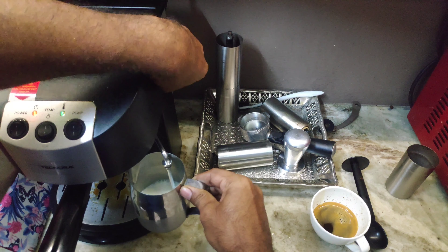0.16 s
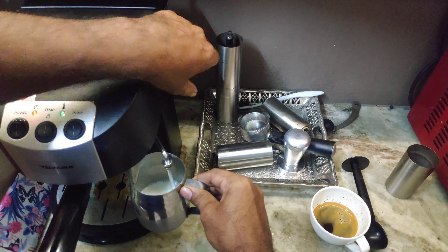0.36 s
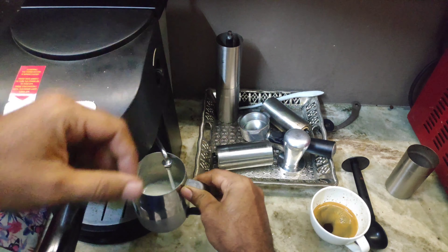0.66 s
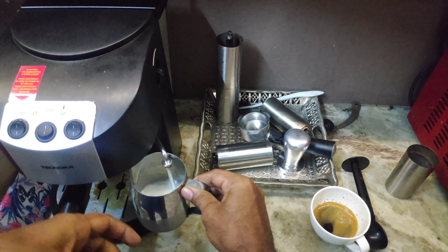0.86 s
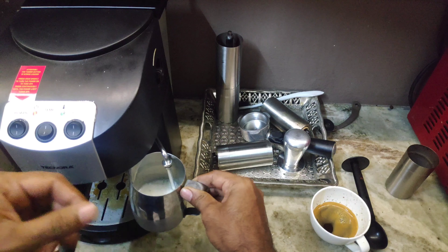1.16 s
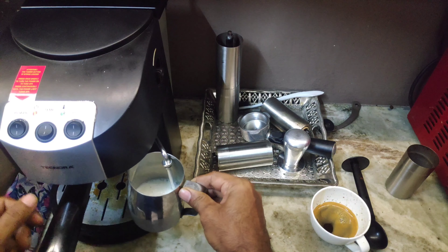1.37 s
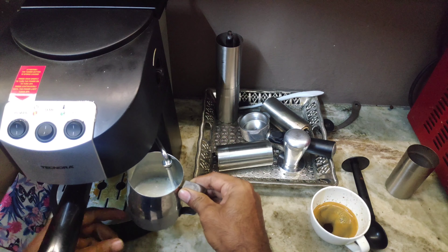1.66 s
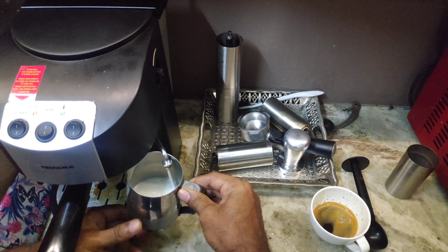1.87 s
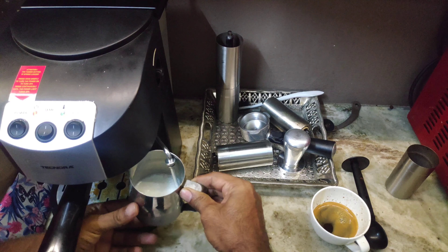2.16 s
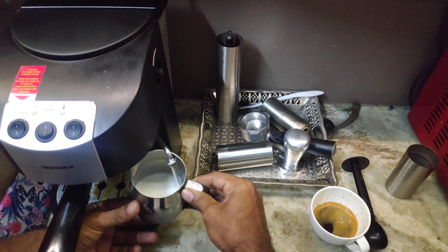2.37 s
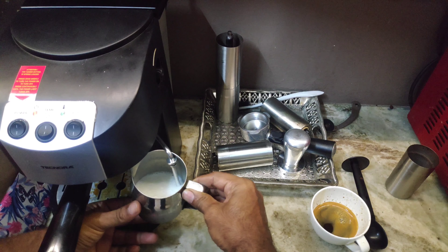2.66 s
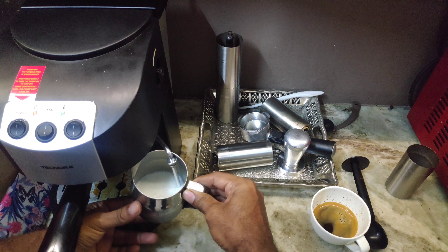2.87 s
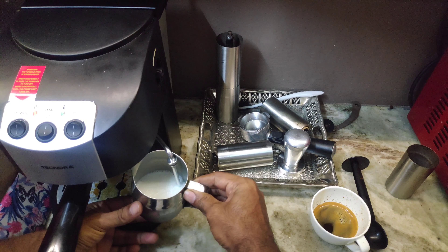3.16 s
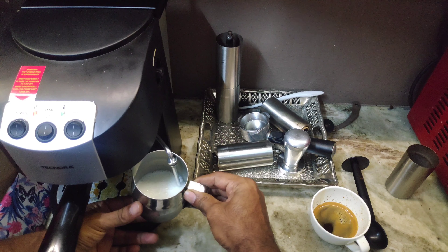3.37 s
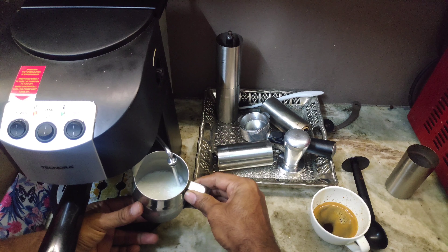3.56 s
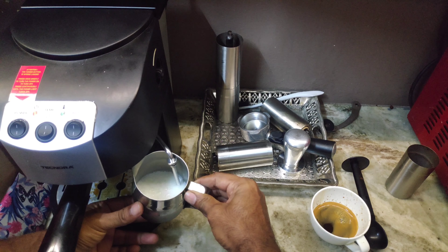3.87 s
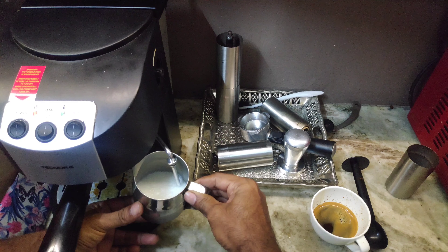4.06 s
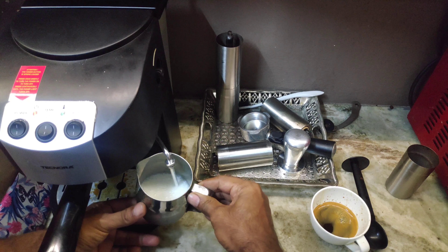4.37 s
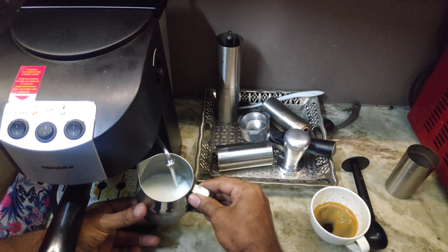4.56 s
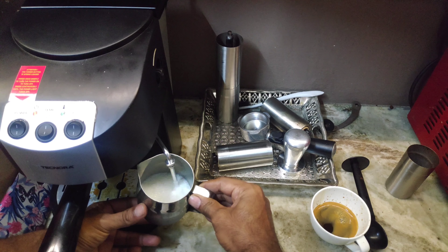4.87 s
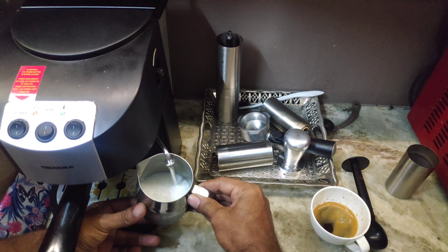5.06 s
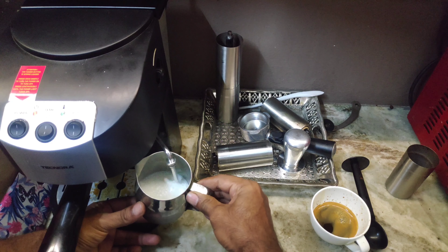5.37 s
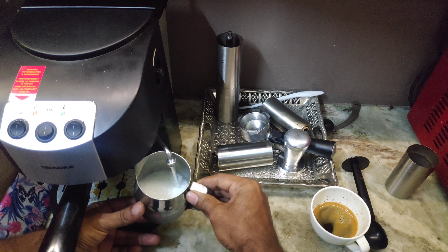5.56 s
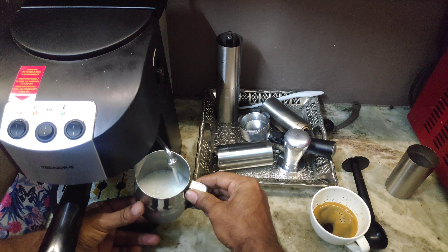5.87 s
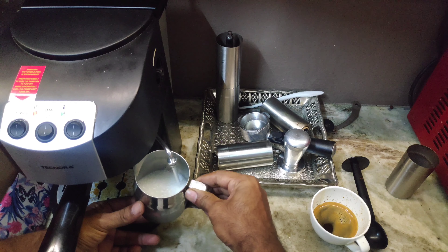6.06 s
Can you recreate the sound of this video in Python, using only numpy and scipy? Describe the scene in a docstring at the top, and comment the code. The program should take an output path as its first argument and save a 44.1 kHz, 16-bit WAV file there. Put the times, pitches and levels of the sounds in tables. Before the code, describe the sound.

A steam wand froths milk in a small steel pitcher in a kitchen, heard close in stereo. Sharp, bright hisses spit in quick irregular bursts over a low gurgling churn and hollow bubble blips. Spurts come fast at first, soften and space out in the middle, then grow dense and forceful again near five seconds. Fine foam fizzes; a faint low hum lies underneath.

```python
"""A steam jet hisses in uneven spurts as its tip breaks the surface of milk in a steel pitcher, heard close in stereo.
Hiss is noise and spatter rung by the steel wall; churn is clumped clicks and noise rung by the air column.
Bursting bubbles are pairs of rising notes, spat drops are noise snaps, the hollow whistle is a narrow noise band.
Fine foam fizzes and a low room hum lies below. Streaks, notches and differences between sides shape the mix."""
import sys
import numpy as np
from scipy import signal
from scipy.fft import rfft, irfft, next_fast_len
from scipy.io import wavfile
from scipy.ndimage import uniform_filter1d, map_coordinates

SR = 44100
rng = np.random.default_rng(int(sys.argv[2]) if len(sys.argv) > 2 else 0)


def pcm_store(signal):
    """Save signal as 16-bit PCM."""
    levels = np.round(np.clip(np.atleast_2d(signal), -1, 1) * 32767)
    wavfile.write(sys.argv[1], SR, levels.astype(np.int16).T)


N = 273861

# Spurts as the tip breaks the surface. Each row: full at in seconds, rise in ms (20 dB), hold in ms,
# hiss level in dB, hiss brightness in dB per octave, churn level in dB, churn depth in dB per octave, body in dB.
SPURTS = [(0.003, 14, 83, -19, 2, -40.5, 7, -3.5), (0.15, 26, 2, -27.5, 11, -35, 1, 2),
          (0.204, 30, 21, -30, 3, -52, 0, 3.5), (0.284, 22, 31, -18, 8.5, -33.5, -2, 5.5),
          (0.451, 32, 14, -23, 10, -34, 0, 9.5), (0.622, 22, 18, -14.5, 0.5, -37.5, 0, -13.5),
          (0.685, 9, 3, -22, 16, -42, -10, 2), (0.72, 4.9, 33, -23, 4.5, -36.5, -3.5, 2),
          (0.778, 4.7, 28, -21, 2.5, -31.5, 0.5, 0), (0.901, 44, 38, -23, 4.5, -35.5, -3, -0.5),
          (1.099, 15, 47, -25, 6, -32.5, -3.5, 8.5), (1.229, 130, 26, -21.5, 2, -35, -2, -0.5),
          (1.517, 156, 46, -23.5, -1, -33, -3.5, -4.5), (1.776, 110, 86, -37.5, 4.5, -35.5, -2, 7),
          (2.064, 110, 52, -30.5, 1, -42, 10, -5), (2.268, 17, 50, -26, 3.5, -35.5, 0.5, 2),
          (2.405, 220, 2, -30, 1.5, -35.5, -4.5, 5), (2.539, 36, 130, -25.5, 4, -33, -1.5, 2),
          (2.705, 6, 18, -32, 2, -38, -1.5, 8), (2.934, 37, 7.8, -20.5, 0, -29, -2, -2.5),
          (2.991, 14, 44, -25, 1.5, -32, -3, -6.5), (3.146, 67, 2, -31, 5, -31.5, -2.5, 2),
          (3.203, 11, 10, -23, 1.5, -37, -2, -6), (3.28, 81, 134, -31.5, 2, -33.5, -6.5, 3),
          (3.469, 280, 80, -28, 1, -35.5, -2, 3.5), (3.648, 66, 36, -32, 0, -39, -1, 5.5),
          (3.792, 67, 16, -27, -0.5, -32.5, -1.5, 7), (4.062, 100, 79, -31, 1.5, -34, -7, 2),
          (4.288, 28, 88, -32, 3, -42, 5, 7), (4.646, 290, 97, -24.5, -3, -32, -1.5, -1),
          (4.78, 12, 41, -22.5, 2.5, -28, -2.5, 4), (4.883, 38, 26, -17, 1.5, -27, -1, -4.5),
          (5.008, 33, 24, -21, -2, -24.5, -5, -5), (5.088, 18, 13, -30, 5, -27, -1, 6.5),
          (5.265, 38, 53, -18.5, 2.5, -36.5, 1.5, -2), (5.427, 10, 2, -31.5, 2, -52, -1, -6),
          (5.587, 26, 3, -29.5, 9, -31, -8.5, 3), (5.621, 18, 3.3, -22, 1, -32.5, 1, 0),
          (5.704, 20, 23, -27, 4.5, -49, -11, 2), (5.762, 12, 110, -29, 2.5, -41.5, 12, 0.5),
          (5.871, 47, 15, -25, 1.5, -34.5, -6.5, -2.5), (5.926, 26, 34, -23.5, 0.5, -37.5, 8, -7.5),
          (6.05, 240, 5, -28, -0.5, -34, 0, -4.5), (6.147, 110, 44, -27, 3.5, -31.5, -3.5, 1)]
# Ringing of the steel wall. Each row: centre in Hz, least width in Hz, level in dB.
WALL_MODES = [(4450, 170, -1), (5300, 150, -2), (7350, 90, -1), (7660, 100, 0), (8570, 120, -3),
              (10170, 110, -3), (10590, 110, -3), (11490, 120, -3), (12140, 130, -3), (13350, 200, -4),
              (14200, 130, 1)]


def amp(db):
    """Decibels to gain."""
    return 10 ** (np.asarray(db) / 20)


def rms_one(x):
    """Scaled to rms 1."""
    return x / np.sqrt(np.mean(x ** 2) + 1e-20)


def in_time(rows):
    """Columns after the time column, interpolated to one value a sample."""
    s, *columns = np.transpose(rows)
    return [np.interp(np.arange(N) / SR, s, c) for c in columns]


def at_hz(points, hz):
    """A table read on a log-frequency axis."""
    point_hz, values = np.array(points).T
    return np.interp(np.log(hz), np.log(point_hz), values)


def drift(rate_hz):
    """Slow random curve of rms 1: coarse noise through a double one-pole low-pass."""
    step = 20   # samples per coarse point
    settle = 2000   # coarse points dropped
    r = np.exp(-2 * np.pi * rate_hz * step / SR)
    coarse = rng.standard_normal(N // step + settle + 2)
    slow = signal.lfilter([1], [1, -2 * r, r * r], coarse)[settle:]
    return np.interp(np.arange(N) / step, np.arange(len(slow)), rms_one(slow - slow.mean()))


def white():
    """Plain noise."""
    return rng.standard_normal(N)


def grains(per_s, spread_db):
    """Random clicks of very uneven size and either sign; rms 1."""
    sizes = amp(spread_db * np.minimum(rng.exponential(1, N), 5)) * rng.choice([-1, 1], N)
    return rms_one(sizes * (rng.random(N) < per_s / SR))


def resonance(x, hz, width_hz):
    """Two-pole resonance of gain 1 on top."""
    r = np.exp(-np.pi * width_hz / SR)
    poles = [1, -2 * r * np.cos(2 * np.pi * hz / SR), r * r]
    return signal.lfilter([(1 - r * r) / 2, 0, (r * r - 1) / 2], poles, x)


def rung(x, modes):
    """The sound plus what it sets ringing; milk damps the wall, so no mode is very sharp."""
    return x + sum(amp(db) * resonance(x, hz, max(width_hz, hz / 110)) for hz, width_hz, db in modes)


def coloured(source, spectrum, span_hz, patchy_db, rate_hz, lean_db=0, pivot_hz=1000):
    """Shaped stereo sound whose third-octave bands flicker apart; lean_db per octave tilts it about the pivot."""
    # Each row: frequency in Hz, left minus right in dB.
    side_tilt = [(60, -0.5), (250, 1.5), (750, -4), (1200, 0.5), (1900, -5), (2900, -1.5), (4500, -5.5),
                 (5800, -5.5), (6800, -5.5), (7900, -3), (9500, -1.5), (11000, 5), (13000, 10), (14200, 9)]
    # Each row: frequency in Hz, correlation of the two sides (0-1).
    likeness = [(60, 1), (250, 1), (600, 0.73), (900, 0.67), (1250, 0.59), (1900, 0.6), (2250, 0.1),
                (2700, 0.16), (3150, 0.76), (3800, 0), (6000, 0.33), (7500, 0.4), (10300, 0.34),
                (13000, 0.4), (14200, 0.3)]
    low, high = np.log2(span_hz)
    edges_hz = 2 ** np.linspace(low, high, int(3 * (high - low)) + 2)
    size = next_fast_len(N)
    grid_hz = np.fft.rfftfreq(size, 1 / SR) + 1
    alike = np.clip(at_hz(likeness, grid_hz), 0, .97)
    shape = amp(at_hz(spectrum, grid_hz) + at_hz(side_tilt, grid_hz) * np.array([[.5], [-.5]]))
    draws = []
    for _ in range(2):   # neighbouring bands get unrelated sound
        mid, side = rfft([source(), source()], size)
        pair = np.sqrt(1 + alike) * mid + np.sqrt(1 - alike) * side * [[1], [-1]]
        draws.append(irfft(pair * shape, size)[:, :N])
    out, steady_power, near = 0, 0, drift(rate_hz)
    for k, (a, b) in enumerate(zip(edges_hz, edges_hz[1:])):
        bandpass = signal.butter(2, [a, b], "band", fs=SR, output="sos")
        pair = signal.sosfilt(bandpass, draws[k % 2])
        own = drift(rate_hz)
        steady_power = steady_power + np.mean(pair ** 2)
        octaves = np.log2(np.sqrt(a * b) / pivot_hz)
        out = out + pair * amp(patchy_db * (near + own) + lean_db * octaves)
        near = own   # flicker is shared with the next band
    return out / np.sqrt(steady_power)


def room_hum():
    """Low room noise."""
    # Each row: frequency in Hz, relative density in dB per Hz.
    room_spectrum = [(12, -30), (20, 2), (97, 1), (140, -15), (193, 2), (280, -9), (300, -4), (390, -14),
                     (660, -120)]
    level_db = -50.5
    return amp(level_db) * coloured(white, room_spectrum, (18, 330), 1.0, 29.0)


def foam_fizz():
    """Fine foam on the milk, swelling and sinking: patchy noise rung by the two lowest wall modes."""
    # Each row: frequency in Hz, relative density in dB per Hz.
    fizz_spectrum = [(710, -15), (1200, 5.5), (1760, -13.5), (2740, 13), (2950, -15), (4430, 0), (7000, -3),
                     (9100, -20), (15400, -120)]
    # Each row: time in seconds, level in dB.
    foam_level = [(0, -64), (1.25, -56), (1.76, -38.5), (3, -42), (4.36, -40), (5, -52), (5.8, -38.5),
                  (6.21, -42.5)]
    level_db, = in_time(foam_level)
    return amp(level_db) * coloured(lambda: rung(white(), WALL_MODES[:2]), fizz_spectrum, (1000, 8000), 0.8, 33.0)


def hollow_whistle(churn_db):
    """Whistle of the jet in the pitcher's mouth: a fading noise band, throbbing partly with the churn."""
    centre_hz, start_db, fade_db_per_s = 2880, -37, 13.5
    t = np.arange(N) / SR
    phase = 2 * np.pi * centre_hz * t
    noise_band = drift(300) * np.cos(phase) + drift(340) * np.sin(phase)
    throb_db = 0.13 * (churn_db - churn_db.mean()) + 2.5 * drift(6)
    return amp(start_db - fade_db_per_s * t + throb_db) * noise_band


def bubbles():
    """Each burst swells and chokes two notes of the pitcher's air, leaving a faint ring; the lower is slower."""
    # Each row: time in seconds, upper note gain in dB, upper note start in Hz,
    # lower note gain in dB, lower note start in Hz.
    bursts = [(0.23, -23.5, 800, -51, 443), (0.302, -32, 790, -26, 471), (0.322, -20.5, 774, -23, 340),
              (0.426, -12.5, 866, -29, 467), (0.439, -20, 966, -34, 466), (0.461, -27, 1000, -30, 500),
              (0.607, -19.5, 1043, -46, 354), (0.781, -21, 630, -20.5, 375), (0.812, -22.5, 840, -41, 400),
              (0.901, -33, 850, -26, 420), (0.964, -19, 930, -52, 362), (1.107, -18.5, 820, -27, 524),
              (1.126, -21, 1086, -32, 457), (1.228, -24, 910, -28, 556), (2.236, -23, 880, -51, 410),
              (2.308, -38, 830, -24.5, 437), (2.836, -26.5, 830, -37, 437), (2.912, -19, 897, -52, 396),
              (2.936, -42, 840, -27, 445), (3.023, -21, 900, -55, 460), (3.285, -20.5, 906, -57, 420),
              (3.448, -24, 920, -54, 457), (3.775, -14, 868, -43, 384), (4.094, -20, 917, -43, 300),
              (4.686, -21.5, 1096, -32, 455), (4.771, -18, 854, -30, 222), (4.803, -15.5, 950, -29, 500),
              (4.89, -23, 903, -23.5, 480), (5.02, -21, 1037, -24, 410), (5.048, -16.5, 953, -28, 356),
              (5.087, -27, 870, -33, 545), (5.152, -23.5, 878, -43, 357), (5.24, -23, 1040, -35, 373),
              (5.273, -29, 720, -23.5, 398), (5.38, -40, 864, -24.5, 416), (5.45, -39, 940, -25, 347),
              (5.619, -19.5, 1040, -41, 374), (5.699, -22.5, 880, -53, 400)]
    upper_swell_s, upper_t60_s = 0.00406, 0.17
    out = np.zeros((2, N))
    for s, upper_db, upper_hz, lower_db, lower_hz in bursts:
        # side_db is taken from the left and added to the right
        for db, hz, slow, side_db in ((upper_db, upper_hz, 1, 2.2), (lower_db, lower_hz, 1.9, 1.4)):
            swell_s, t60_s = slow * upper_swell_s, slow * upper_t60_s
            start = round((s - swell_s) * SR)
            age = np.arange(min(int(t60_s * SR), N - start)) / SR
            swell = age / swell_s
            puff = 0.41 * np.exp(-(swell - 2) ** 2)
            ring = 0.12 * amp(-60 * age / t60_s) * np.minimum(swell / 2, 1) ** 2
            # pitch rises as the bubble shrinks
            note = amp(db) * (puff + ring) * np.sin(2 * np.pi * hz * age * (1 + 0.92 * age))
            out[:, start:start + len(age)] += note * amp([[-side_db], [side_db]])
    return out


def churn(level_db, depth_db):
    """Vapour bubbles collapse in clumps and excite the pitcher; depth leans the sound to the low end."""
    # Each row: frequency in Hz, relative density in dB per Hz.
    churn_spectrum = [(88, 5), (150, -22), (188, -8), (284, -10), (365, -1.5), (563, -6.5), (648, -8.5),
                      (897, 5.5), (1320, -11), (1460, -5.5), (1780, -19.5), (2000, -16), (2600, -14.5),
                      (4400, -120)]
    # Air column and walls. Each row: centre in Hz, least width in Hz, level in dB.
    pitcher_modes = [(215, 52, 4.5), (348, 71, -1), (429, 19.4, 1), (558.5, 13, 2), (724, 26, -4),
                     (860, 17, -18), (944, 4.3, -7.5), (1066, 22, -2)]

    def collapses():
        return rung(grains(900, 2.4) + 0.98 * white(), pitcher_modes)

    clumps = amp(1.8 * drift(30))
    pops = coloured(collapses, churn_spectrum, (110, 2500), 1.45, 8.7, -depth_db, 1320)
    return amp(level_db) * clumps * pops


def spits():
    """Single drops spat off the jet: each a bright, decaying snap of high-passed noise."""
    # Each row: start in seconds, gain in dB.
    drops = [(0.0784, -20), (0.317, -3), (0.6245, -19), (0.787, -12), (3.2244, -12), (5.2784, -9),
             (5.302, -4)]
    t60_s, low_hz = 0.012, 7600
    out, age = np.zeros((2, N)), np.arange(400) / SR
    for s, db in drops:
        start = round(s * SR)
        noise = rng.standard_normal((2, len(age)))
        out[:, start:start + len(age)] += amp(db - 60 * age / t60_s) * noise
    return signal.sosfilt(signal.butter(4, low_hz, "high", fs=SR, output="sos"), out)


def hiss(level_db, bright_db, body_db):
    """Torn steam: noise and fine spatter, fluttering fast, with more or less body under its top."""
    # Each row: frequency in Hz, relative density in dB per Hz.
    hiss_spectrum = [(1000, -40), (1700, -14.5), (2630, -4.5), (2920, 2), (3080, 4), (4480, -5.5),
                     (4940, -5.5), (7760, 1.5), (9350, 2), (13700, 1), (14200, -1)]
    body_top_hz = 6000

    def spatter():
        return rung(white() + 1.25 * grains(2500, 2.0), WALL_MODES)

    flutter = amp(0.39 * drift(130) + 0.18 * drift(43))
    tear = coloured(spatter, hiss_spectrum, (1200, 15000), 1.46, 16.8, bright_db, 7850)
    body = signal.sosfiltfilt(signal.butter(2, body_top_hz, fs=SR, output="sos"), tear)
    return amp(level_db) * flutter * (tear + (amp(body_db) - 1) * body)


def over(simmer_db, simmer_lean_db, peaks_db, leans_db, fall_db_per_s, dulling):
    """Spurts climb 20 dB in their rise time, hold and fall over the simmer: level, and lean weighted by power."""
    t = np.arange(0, N, 32) / SR
    s, rise_ms, hold_ms = np.transpose(SPURTS)[:3, :, None]
    rise_s, hold_s = np.maximum(rise_ms, 2) / 1000, hold_ms / 1000
    shape_db = 20 * np.minimum(t - s, 0) / rise_s - fall_db_per_s * np.maximum(t - s - hold_s, 0)
    each = amp(peaks_db[:, None] + shape_db) ** 2
    each_lean = each * (leans_db[:, None] + dulling * shape_db)
    power, lean = (np.interp(np.arange(N) / SR, t, np.sum(x, axis=0)) for x in (each, each_lean))
    steady = amp(simmer_db) ** 2
    return 10 * np.log10(steady + power), (steady * simmer_lean_db + lean) / (steady + power)


def jet():
    """Curves of the spurting jet: hiss level, brightness, body, churn level and depth."""
    # Between spurts, tip under the milk. Each row: time in seconds, hiss level in dB,
    # brightness in dB per octave, churn level in dB, churn depth in dB per octave.
    simmer = [(0, -60, 11, -39, -4.5), (.5, -35.5, -5.5, -39.5, 1.5), (1.05, -35.5, 0.5, -43.5, -2),
              (1.4, -42, -5.5, -41.5, -3), (1.65, -34, -5.5, -42.5, -4), (2, -32, -3.5, -35, -6.5),
              (2.45, -34.5, -2.5, -40, -0.5), (2.85, -35.5, -4, -39.5, -2.5), (3.1, -64, 0, -42, -9),
              (3.65, -35.5, 1.5, -38, -7.5), (4, -32, -2.5, -36, -3), (4.45, -36, 0.5, -35, -5),
              (5, -33, 19, -58, -19), (5.2, -46, 5, -32.5, -4), (5.53, -41.5, -0.5, -33, -1.5),
              (6.21, -42, -3, -35, -9.5)]
    hiss_fall_db_per_s, churn_fall_db_per_s = 182, 152
    dulling = 0.442   # dB per octave of brightness lost for each dB a spurt is under its peak
    hiss_db, bright_db, churn_db, depth_db = in_time(simmer)
    peak_hiss_db, peak_bright_db, peak_churn_db, peak_depth_db, peak_body_db = np.transpose(SPURTS)[3:]
    _, body_db = over(hiss_db, 0, peak_hiss_db, peak_body_db, hiss_fall_db_per_s, 0)
    hiss_db, bright_db = over(hiss_db, bright_db, peak_hiss_db, peak_bright_db, hiss_fall_db_per_s, dulling)
    churn_db, depth_db = over(churn_db, depth_db, peak_churn_db, peak_depth_db, churn_fall_db_per_s, 0)
    return hiss_db, bright_db, body_db, churn_db, depth_db


def notched(hz, s):
    """Gain of wandering, flickering hollows: four notches whose centre and depth drift at random."""
    # Each row: centre at first in Hz, centre later in Hz, width in Hz,
    # mean depth at first, mean depth later (0-1, clipped after flicker).
    notch_rows = [(1750, 1770, 200, -.2, .55), (2580, 2630, 170, .85, .55), (3750, 4020, 200, .5, .65),
                  (5100, 4900, 260, .3, .6)]
    moves_s = (1.9, 4.1)   # from, until
    wander_hz, flicker, deepest = 45, .4, .96
    gain, at = 1, np.minimum((s * SR).astype(int), N - 1)
    for first_hz, later_hz, width_hz, *depths in notch_rows:
        depth = np.interp(s, moves_s, depths) + flicker * drift(8.5)[at]
        centre_hz = np.interp(s, moves_s, (first_hz, later_hz)) + wander_hz * drift(6.9)[at]
        notch = 1 / (1 + (2 * (hz[:, None] - centre_hz) / width_hz) ** 6)
        gain = gain * (1 - np.clip(depth, 0, deepest) * notch)
    return gain


def streaked(pair):
    """Notches, streaky dips partly apart on each side, and a phase sway, all applied to short spectra."""
    # Each row: frequency in Hz, share of the dip.
    streak_span = [(1100, 0), (2400, 0.83), (5000, 1.46), (8300, 0.68), (10500, .4), (14000, 0)]
    # Each row: frequency in Hz, spread of the phase between the sides in radians.
    phase_sway = [(300, 0), (600, 0.42), (6000, 0.92)]
    streak_hz, streak_s, streak_db, shared = 128, 0.044, 17, 0.43   # breadth, length, dip scale, share
    hz, s, spectra = signal.stft(pair, SR, nperseg=1024, noverlap=768)
    field = rng.standard_normal((4, *spectra.shape[1:]))
    steps = np.arange(-12, 13)
    for axis, size in ((1, streak_hz / hz[1]), (2, streak_s / s[1])):   # smooth in pitch, then time
        kernel = np.exp(-2 * (steps / size) ** 2)
        field = signal.fftconvolve(field, np.expand_dims(kernel, (0, 3 - axis)), "same")
    sway = at_hz(phase_sway, hz + 1)[:, None] * rms_one(uniform_filter1d(field[3], size=7, axis=0))
    chance = rms_one(np.sqrt(shared) * field[0] + np.sqrt(1 - shared) * field[1:3])
    dip_db = streak_db * at_hz(streak_span, hz + 1)[:, None] * np.maximum(chance - 0.5, 0) ** 1.43
    turn = np.exp(1j * sway * [[[1]], [[0]]])   # left only
    spectra = spectra * notched(hz, s) * amp(-dip_db) * turn
    return signal.istft(spectra, SR, noverlap=768)[1][:, :N]


def delayed(x, ms):
    """The sound read late by a sliding delay."""
    return map_coordinates(x, [np.arange(N) - ms * SR / 1000], order=3, mode="nearest")


def left_shifted(left, right):
    """The left microphone's delay and level slide as the pitcher shifts."""
    # Each row: time in seconds, extra delay of the left in ms, level of the left in dB.
    left_path = [(0, 0.12, -3.5), (.62, 0.12, -3.5), (1.3, 0.12, -0.5), (3, 0.12, -1.5), (3.6, 0.11, -0.5),
                 (6.21, 0.084, -1.5)]
    lag_ms, left_db = in_time(left_path)
    return np.array([amp(left_db) * delayed(left, lag_ms), right])


def band(x, hz, width_hz):
    """The part of a sound around a moving centre: shifted down, low-passed without lag, shifted back."""
    turn = np.exp(2j * np.pi * np.cumsum(hz) / SR)
    lowpass = signal.butter(3, width_hz / 2, fs=SR, output="sos")
    return 2 * np.real(signal.sosfiltfilt(lowpass, x / turn) * turn)


def opposed(pair):
    """A band with a wandering centre loses its common part, leaving the two sides in opposite phase."""
    # Each row: time in seconds, centre in Hz, loss of the common part in dB, breadth (0-1, narrow to broad).
    opposed_band = [(0, 3430, 18, 0.95), (.22, 3330, 27, 0.05), (.3, 3430, -1, 0), (.47, 3250, 24, 0.5),
                    (.55, 3350, 26, 1), (.61, 3450, 12, 1), (.72, 3560, 14, 0.2), (.8, 3200, 27, 0.5),
                    (.9, 3660, 24, 0.7), (1.26, 3300, 36, 1), (1.32, 3380, 1, 0.3), (1.55, 3230, 18, 0.7),
                    (1.65, 3100, 4, 0.2), (1.82, 3160, 5, 0.4), (1.88, 3270, 35, 1), (2.33, 3150, 26, 0.63),
                    (2.42, 2980, 18, 0.3), (3.1, 2940, 3, 0.2), (3.3, 2960, 20, 0.07), (4.4, 2960, 23, 0),
                    (4.7, 2980, 10, 0), (5.3, 2960, 2, 0.1), (5.42, 2930, 26, 0), (6.21, 2930, 10, 0)]
    narrow_hz, broad_hz = 260, 750
    centre_hz, loss_db, breadth = in_time(opposed_band)
    common = pair.mean(axis=0)
    narrow = band(common, centre_hz, narrow_hz)
    broad = band(common, centre_hz, broad_hz)
    return pair - (1 - amp(-loss_db)) * (narrow + np.clip(breadth, 0, 1) * (broad - narrow))


def scene():
    """Jet, milk and room at the two microphones."""
    hiss_db, bright_db, body_db, churn_db, depth_db = jet()
    milk = foam_fizz() + churn(churn_db, depth_db) + bubbles()
    steam = hiss(hiss_db, bright_db, body_db) + hollow_whistle(churn_db) + spits()
    left, right = streaked(milk + steam) + room_hum()
    return opposed(left_shifted(left, right))


def record(dry):
    """The top is cut steeply."""
    cutoff_hz = 14250
    return signal.sosfilt(signal.ellip(10, .5, 70, cutoff_hz, fs=SR, output="sos"), dry)


dry = scene()
out = record(dry)
pcm_store(out)
```